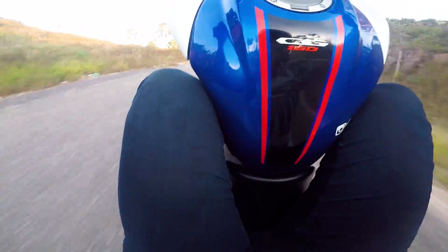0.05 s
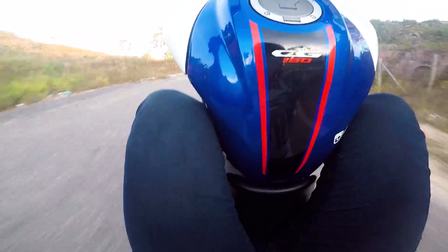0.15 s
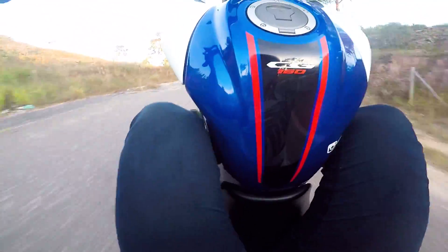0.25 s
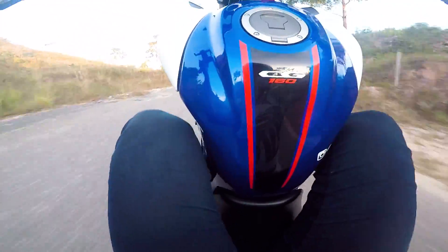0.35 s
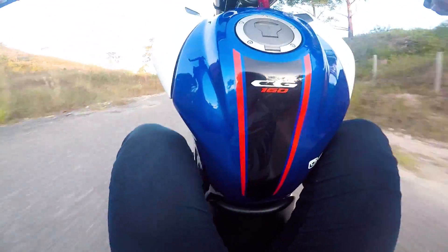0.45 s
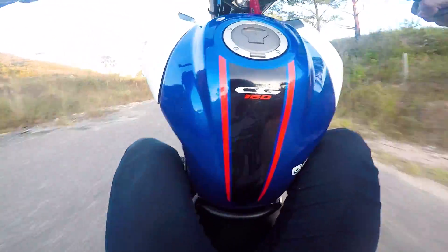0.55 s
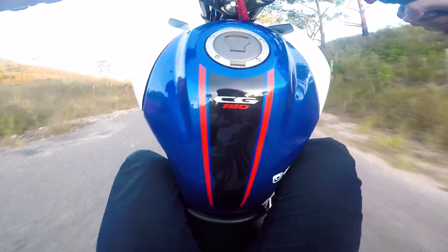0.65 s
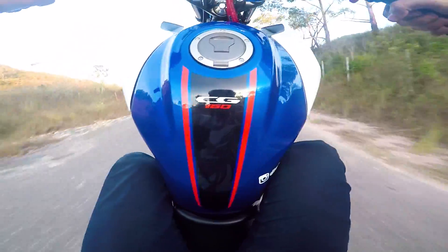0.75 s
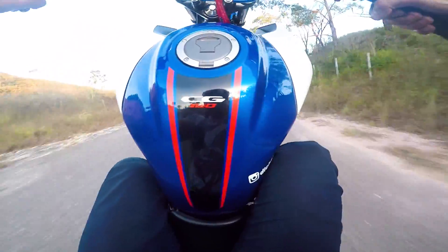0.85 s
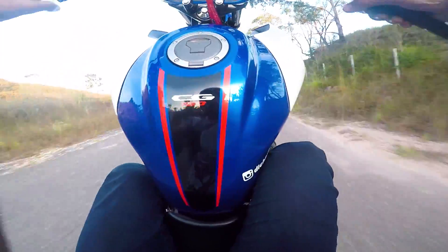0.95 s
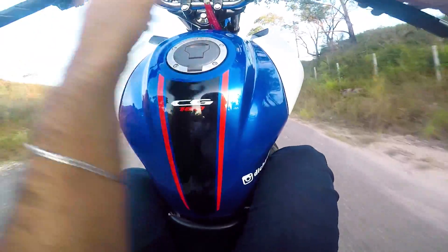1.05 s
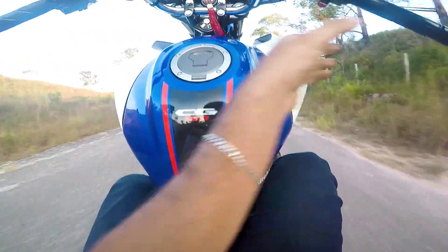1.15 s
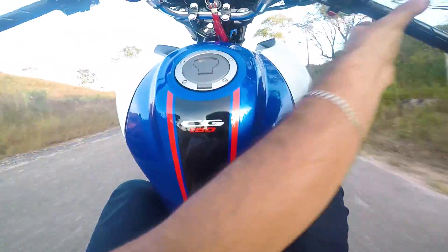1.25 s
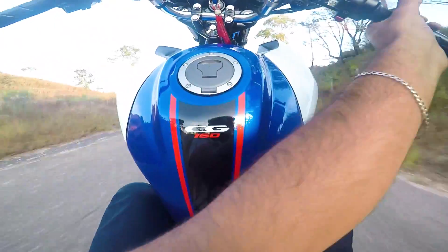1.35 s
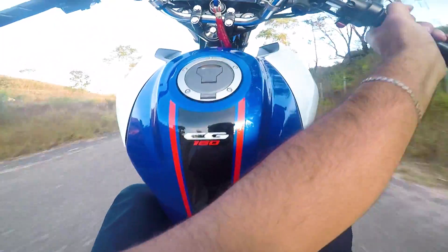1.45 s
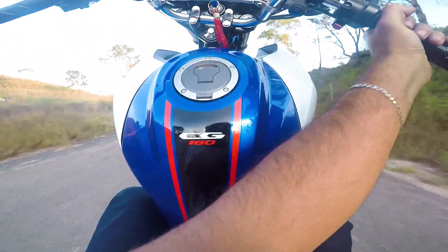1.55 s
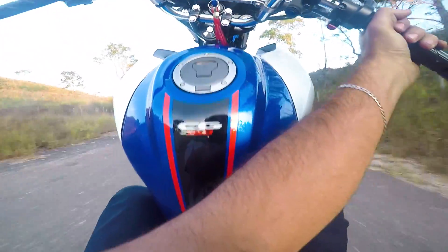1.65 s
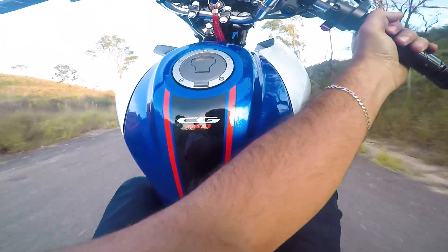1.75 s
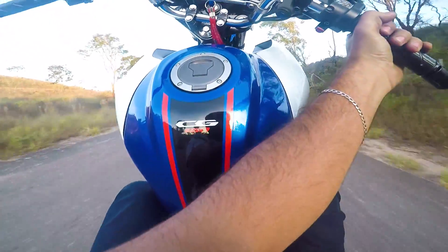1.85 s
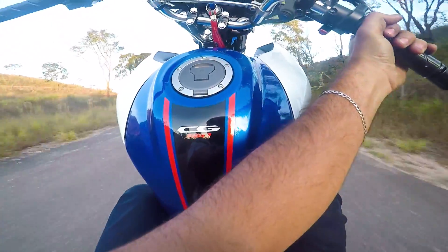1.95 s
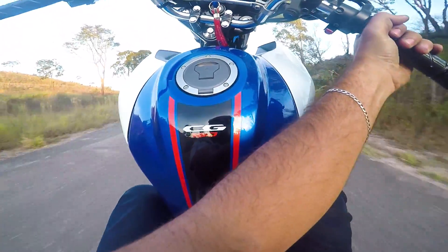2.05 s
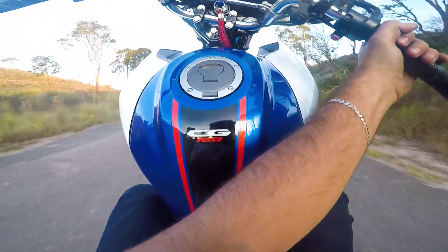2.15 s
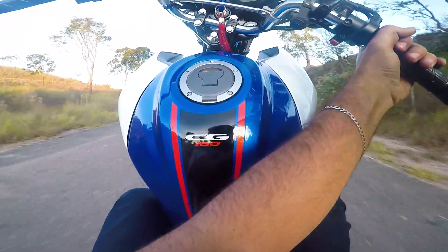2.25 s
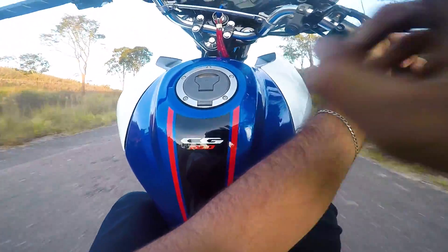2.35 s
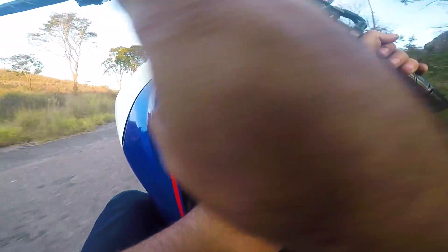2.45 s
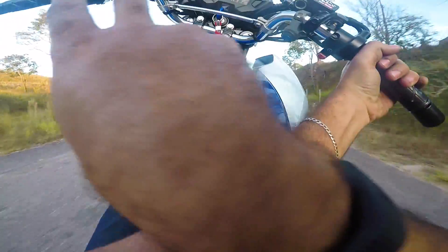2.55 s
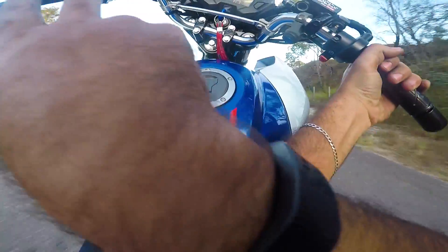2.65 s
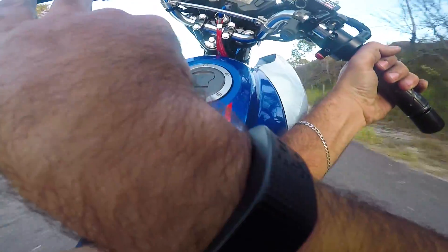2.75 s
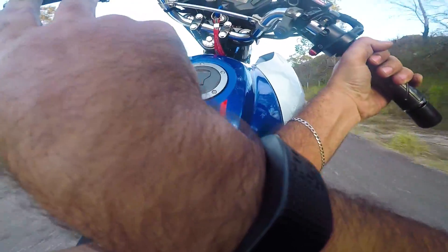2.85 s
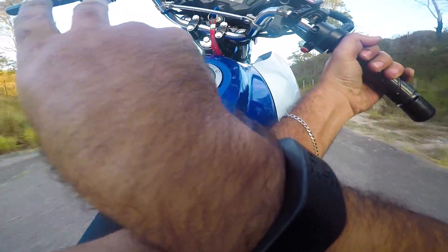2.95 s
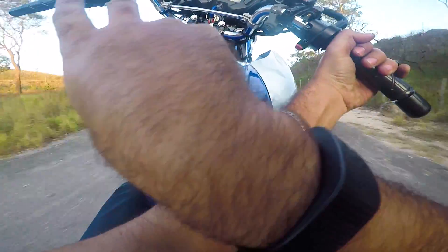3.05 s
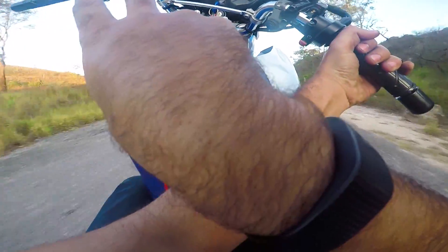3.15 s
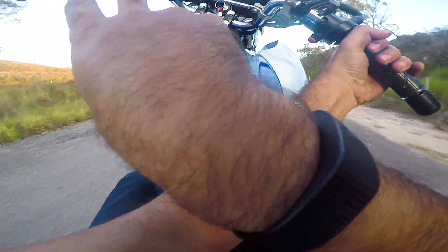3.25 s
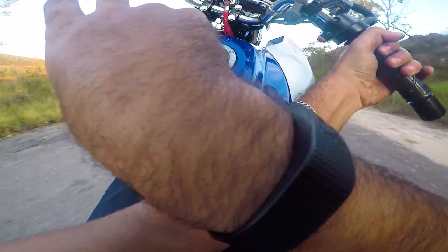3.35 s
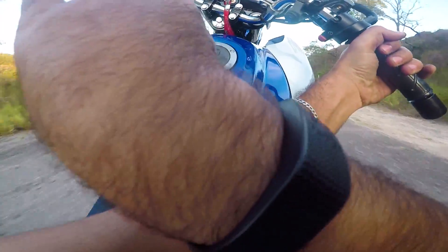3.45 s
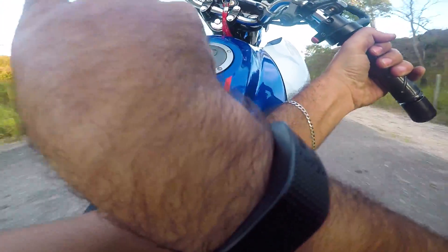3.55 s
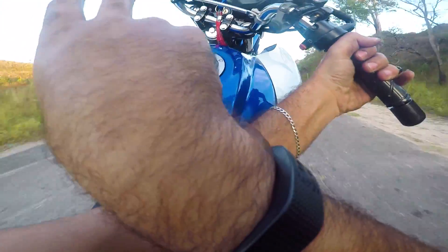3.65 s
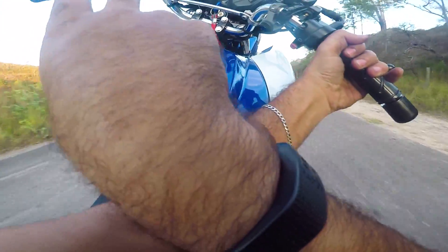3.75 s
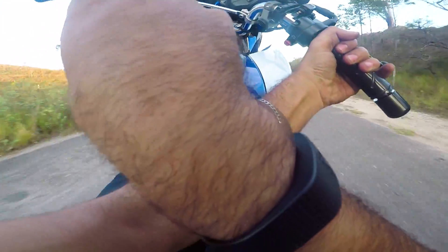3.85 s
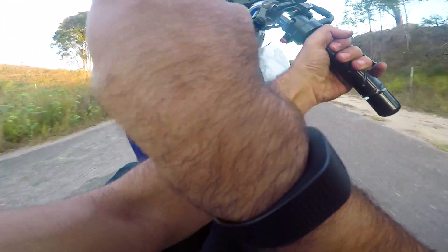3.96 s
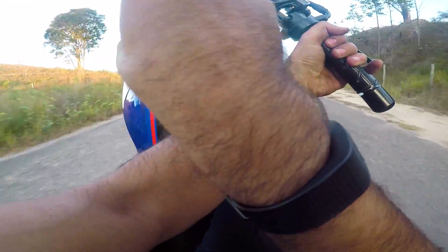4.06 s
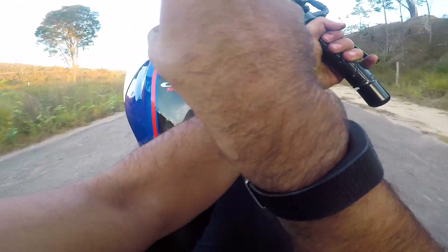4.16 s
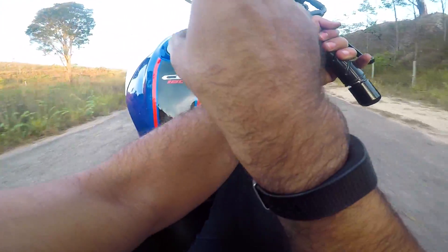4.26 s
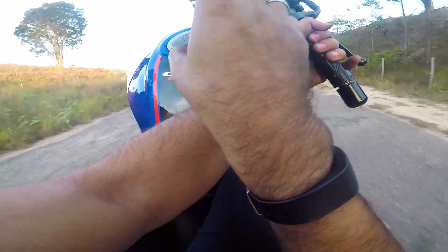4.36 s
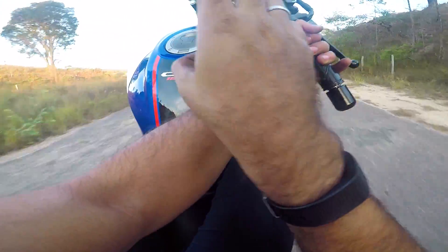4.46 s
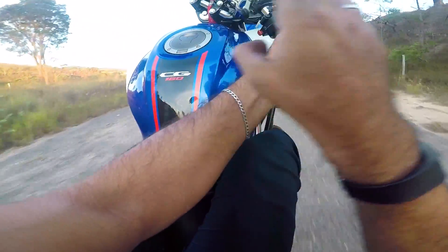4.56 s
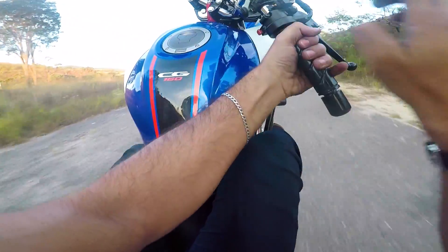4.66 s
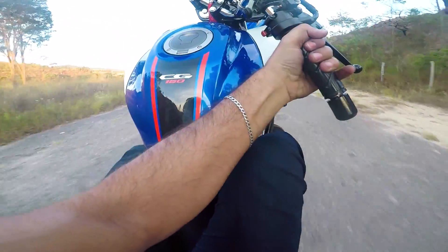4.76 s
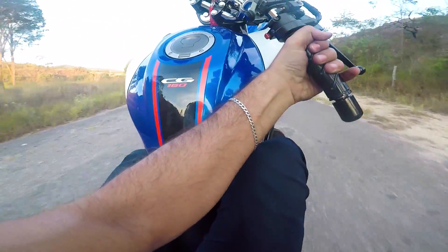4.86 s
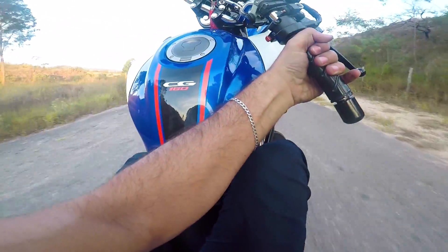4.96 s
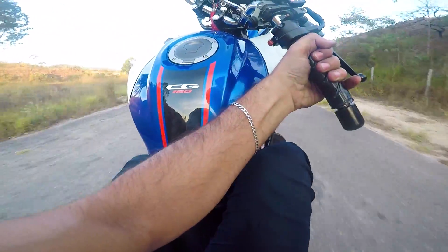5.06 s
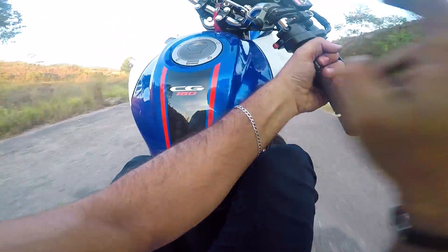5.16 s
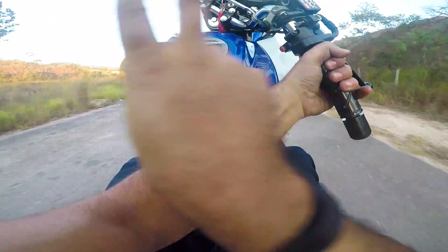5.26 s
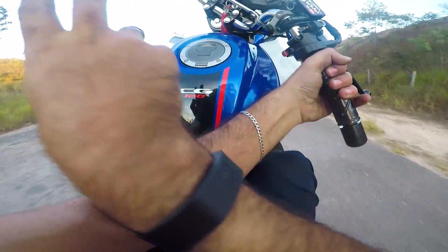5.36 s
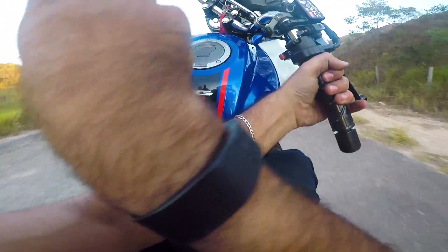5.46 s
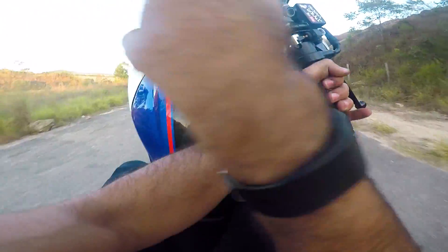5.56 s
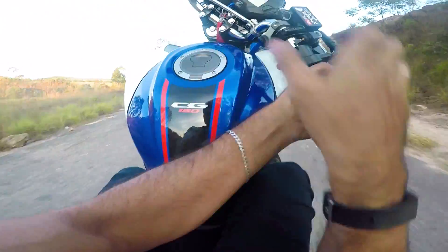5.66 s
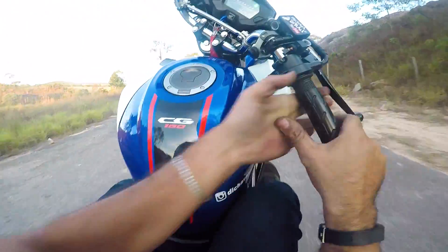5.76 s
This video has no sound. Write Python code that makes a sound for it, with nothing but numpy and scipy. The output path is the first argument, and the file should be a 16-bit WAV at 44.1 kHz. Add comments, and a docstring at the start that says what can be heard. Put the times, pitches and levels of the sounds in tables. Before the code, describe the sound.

A single-cylinder motorcycle coasts along a country road, its exhaust burbling lower and slower under gusty wind and a soft whirr of chain and tyres. The throttle opens and the engine booms up to its rev limiter as the wind fades. It stays there, droning and firing rapid, even bursts of sharp cracks from the open pipe until the throttle shuts. The microphone is close, on the rider's chest.

```python
"""A one-cylinder motorcycle coasts with its throttle shut in buffeting wind. Chain and tyres whirr, unburnt
gas puffs from the pipe, the intake drones, a gear whine falls and a valve ticks. Near 1.5 s the spark
returns and the throttle opens: the engine booms and snarls up to its speed limiter as the wind fades.
From 1.9 s the limiter keeps cutting the spark, letting three firings crack through the open pipe each time
the speed has sagged. At 5.7 s the throttle shuts. Two microphone ports on the rider's chest hear it all."""
import sys
import numpy as np
from scipy import signal
from scipy.fft import rfft, irfft, next_fast_len
from scipy.io import wavfile
from scipy.ndimage import uniform_filter1d

SR = 44100
rng = np.random.default_rng(int(sys.argv[2]) if len(sys.argv) > 2 else 0)


def master_out(mix):
    """Clip the mix to full scale and print it as 16-bit PCM to the path in sys.argv[1]."""
    frames = np.transpose(np.atleast_2d(mix))
    ceiling = np.clip(frames, -1, 1)
    pcm = np.round(ceiling * 32767).astype(np.int16)
    wavfile.write(sys.argv[1], SR, pcm)


N = 256201
TIME = np.arange(N) / SR
LIMIT_LOW, LIMIT_HIGH, CLIMB_S = 77.5, 81.5, .04  # cycles per second at the limiter; time to climb
FIRST_CUT_S, SPARK_ON_S = 1.92, .033

# Engine speed, coasting then revving: time_s, cycles_per_s
SPEED = [(0, 58.1), (0.4, 48.8), (.6, 44.3), (0.83, 39.5), (.99, 36.4), (1.18, 32.2), (1.32, 29.8),
         (1.4, 29.2), (1.44, 30.9), (1.5, 35.7), (1.62, 51.0), (1.85, 76.6), (1.9, 80.5), (1.925, 81.3)]
# Each return of the spark: start_s, crack_db
RESTARTS = [(1.4337, -33), (2.0243, -35), (2.1626, -33), (2.2883, -33), (2.4267, -36), (2.5525, -36),
            (2.6905, -35), (2.8286, -34), (2.9668, -35), (3.1051, -36), (3.2434, -36), (3.3816, -34),
            (3.5198, -34), (3.6581, -34), (3.7964, -33), (3.9344, -32), (4.0726, -31), (4.2108, -32),
            (4.3491, -31), (4.4875, -31), (4.6132, -31), (4.7512, -30), (4.8768, -32), (5.0149, -33),
            (5.1406, -32), (5.2788, -33), (5.4045, -34), (5.5428, -33), (5.6683, -33)]
# Speed around each return at the limiter: offset_s, cycles_per_s
BOUNCE = [(-.007, LIMIT_LOW), (CLIMB_S - .007, LIMIT_HIGH), (.05, 80.65)]
# Tone of the wind: pitch_hz, level_db
WIND_TONE = [(5, -26), (10, -3.5), (22, 8), (40, -7), (80, -15), (170, -23), (400, -28.5), (800, -34),
             (1500, -50), (3000, -96)]
# The wind dies as the bike stops: time_s, level_db
WIND_LEVEL = [(0, -15.5), (1., -14), (1.15, -16), (1.8, -16), (1.95, -23.5), (2.5, -25), (4.5, -27.5),
              (5.81, -29)]
# Gusts: peak_s, boost_db
GUSTS = [(.05, 2), (.17, 2), (.39, 5.5), (.48, 1), (.68, 1), (.75, 0.5), (.92, 2), (1.21, 1), (1.43, 6.5)]
# Tone of the rolling parts: pitch_hz, level_db
WHIRR_TONE = [(530, -35.5), (900, -7), (1050, -4), (1170, -6.5), (1440, -4), (1620, -11), (1910, -9.5),
              (2100, -18.5), (2510, -15), (3040, -21.5), (3580, -21), (3890, -20), (4350, -28), (5410, -34),
              (6290, -33), (8680, -43), (10200, -39.5), (12300, -49), (15000, -61)]
# Their fade: time_s, level_db
WHIRR_LEVEL = [(0, -35.5), (.5, -36), (.9, -39), (1.4, -41.5), (2., -50)]
# Tone of an unburnt puff: pitch_hz, level_db
PUFF_TONE = [(15, -30), (40, 0), (1100, 0), (2200, -30), (4000, -90)]
# Pipe rings after a puff: pitch_hz, width_hz, level_db
PUFF_RINGS = [(144, 44, 5), (223, 154, -10.5), (285, 30, -5), (540, 47, -5.5), (655.5, 34, -6.5)]
# Thump of a puff: time_s, level_db
THUMP_LEVEL = [(0, -19), (.8, -16), (1.4, -14)]
# Tone of a gulp of air: pitch_hz, level_db
GULP_TONE = [(20, -40), (100, -25), (165, -14), (215, 0), (480, 0), (570, -10), (1300, -20), (2200, -45),
             (4000, -90)]
# Rings of the airbox, the intake's chamber: pitch_hz, width_hz, level_db
AIRBOX_RINGS = [(228.8, 43.6, 2.9), (354.1, 45.9, -1.1), (399.6, 51.1, -.8), (450.3, 46.5, -3.2)]
# Each airbox ring in the late tone: change_db
AIRBOX_LATE = [0.28, -2, 0.73, -2.3]
# Drone and snarl shift from an early to a late tone: time_s, late_share
TONE_SHIFT = [(3.3, 0.074), (4.1, 0.62)]
# Piston hums: waves_per_cycle, level_db, delay_cycles
PISTON_HUMS = [(1, -19, 0.29), (2, -11, 0.433)]
# Gear whine: time_s, pitch_hz, level_db
WHINE = [(.14, 1987, -56), (0.199, 1915, -40), (.33, 1830, -36.5), (.37, 1810, -56)]
# Rings of a valve tick: pitch_hz, half_width_hz, level_db
TICK_RINGS = [(2400, 110, 5), (2720, 250, 7.5), (3680, 570, -22)]
# Ticks are clearest at low speed: time_s, level_db
TICK_LEVEL = [(0, -62), (.85, -49), (1., -47.5), (1.2, -43.5), (1.4, -50), (1.45, -80)]
# Intake and pipe rings under load: pitch_hz, width_hz, level_db, delay_cycles
BOOM_RINGS = [(231, 62, 4, .3), (277, 48, 3.5, .3), (384.5, 89, 0, 0.298), (596, 90, -9.5, 0.054)]
# Their swell: time_s, level_db
BOOM_LEVEL = [(1.38, -50), (1.42, -28), (1.49, -15.5), (1.58, -15), (1.7, -21), (1.85, -59)]
# Tone of rushing gas: pitch_hz, level_db
RUSH_TONE = [(200, -34), (400, -4), (700, -5), (950, 0.5), (1700, -5), (2800, -12.5), (3600, -15.5),
             (4000, -13.5), (4300, -22), (4600, -18), (4900, -25), (5400, -24), (6300, -25), (8000, -31),
             (15000, -50)]
# Its rise on revving: time_s, level_db
RUSH_LEVEL = [(1.4, -56), (1.5, -28), (2., -33), (5.81, -32.5)]
# Valve gear at speed: pitch_hz, width_hz, level_db
RASP_RINGS = [(3930, 380, -10), (4530, 320, -10)]
# Firings hit harder while speeding up: time_s, boost_db
CRACK_BOOST = [(1.435, -2.5), (1.47, 5.5), (1.6, 5), (1.75, 3.5), (1.92, 0)]
# Bursts within one firing: start_s, gas_db, spike_db
BURSTS = [(0, -3, -20.5), (.0015, -3.5, -6), (.003, -3, -3)]
# Pipe rings after a firing: pitch_hz, width_hz, level_db
PIPE_RINGS = [(1136, 90, -2.5), (1770, 640, -3), (2497, 130, 1.5), (2520, 950, -5), (4330, 1840, -9.5),
              (4980, 110, -8.5), (7200, 3450, -22)]
# Clean pipe rings sink and swell: time_s, bark_hz, bark_db, blat_hz, blat_db, clang_db
CLEAN_RINGS = [(1.45, 1342, 62.5, 1950, 38, 41), (1.7, 1307, 62.5, 1960, 57, 45),
               (1.818, 1283, 65, 1770, 53, 46.5), (1.9, 1205, 60, 1800, 57, 38),
               (2., 1194, 61.5, 1610, 61, 42), (2.298, 1245, 61, 1600, 55.5, 42),
               (2.43, 1180, 59.5, 1764, 63, 38), (2.849, 1230, 57.5, 1850, 57, 40),
               (3.099, 1210, 64, 1775, 64, 38.5), (3.601, 1210, 54, 1724, 55.5, 36.5),
               (4.099, 1210, 46, 1630, 56.5, 41.5), (4.5, 1145, 42, 1595, 54.5, 43.5),
               (4.649, 1210, 57, 1586, 54, 45), (5.05, 1240, 62, 1540, 38, 37.5),
               (5.2, 1170, 38, 1590, 54.5, 40.5), (5.7, 1213, 44, 1700, 48, 42.5)]
# Clang of the pipe's wall: pitch_hz, width_hz, level_db
WALL_RINGS = [(2460, 120, 12), (2950, 100, 6.5), (4160, 107, 1), (5050, 140, -0.5)]
# Hot jet at the pipe's mouth: pitch_hz, level_db
SIZZLE_TONE = [(3000, -29), (6000, 4), (9000, -5.5), (12000, -8), (15000, -27.5)]
# Engine overtones, from the 7th up: early_db, late_db
OVERTONES = [(-38.5, -30), (-30.5, -33.5), (-49.5, -32), (-36, -28.5), (-40.5, -41), (-37.5, -37),
             (-33.5, -29), (-45, -41), (-53, -32.5), (-45, -46), (-39, -36), (-53, -54.5), (-53, -50),
             (-49.5, -49), (-50, -53)]
# Those from the 14th up swell for a while: time_s, boost_db
NASAL_BOOST = [(4.55, -0.5), (4.65, 5.5), (5.1, 5.5), (5.25, -1)]
# How alike the two ports sound: pitch_hz, likeness_share
PORT_LIKENESS = [(300, 1), (600, .9), (1200, .8), (2500, .8), (4000, .5), (9000, .4)]
# How far the left port leads: pitch_hz, lead_radians
PORT_LEAD = [(100, 0), (860, 0.43), (1210, 1.64), (1720, 2.5), (2450, 2.5), (3270, 3), (4500, 5),
             (7000, 4.5)]
# How much louder the left port is: pitch_hz, level_db
PORT_BALANCE = [(60, 3), (250, 2.5), (400, 4), (480, 6), (640, 3.5), (800, 1), (1050, -0.5), (1270, 2.5),
                (2350, 1.5), (4320, 1.5), (7960, 1.5), (14700, -8)]


def amp(db):
    """Turns decibels into a multiplier."""
    return 10 ** (np.asarray(db) / 20)


def evened(x):
    """Scales a sound to an average power of 1."""
    return x / np.sqrt(np.mean(x ** 2) + 1e-20)


def curve(rows):
    """Joins (time, value) points with straight lines."""
    return np.interp(TIME, *np.transpose(rows))


def shaped(x, points, gain=amp):
    """Weights each pitch in a sound by a table."""
    pitch_hz, value = np.transpose(points)
    size = next_fast_len(N)
    hz = np.fft.rfftfreq(size, 1 / SR)
    weights = gain(np.interp(np.log(hz + 1), np.log(pitch_hz + 1), value))
    return irfft(rfft(x, size) * weights, size)[..., :N]


def ring(x, rings):
    """Rings at fixed pitches, alternating in sign as along a tube."""
    out = 0
    for k, (hz, width, db) in enumerate(rings):
        decay = np.exp(-np.pi * width / SR)
        step = decay * np.exp(2j * np.pi * hz / SR)
        out = out + (-1) ** k * amp(db) * signal.lfilter([1 - decay], [1, -step], x).real
    return out


def soft_ring(x, hz, width):
    """A ring that swells in, then dies; its pitch may be fixed or sliding."""
    spin = np.exp(2j * np.pi * np.cumsum(np.broadcast_to(hz, N)) / SR)
    decay = np.exp(-np.pi * width / SR)
    return (spin * signal.lfilter([(1 - decay) ** 2], [1, -2 * decay, decay ** 2], x / spin)).real


def drift(hz):
    """A slow random wander."""
    return evened(signal.lfilter(*signal.butter(2, hz, fs=SR), rng.standard_normal((2, N))))[0]


def engine_cycles():
    """Counts four-stroke cycles; a whole number fits between returns of the spark."""
    starts = np.transpose(RESTARTS)[0]
    bounces = [(s + offset, hz) for s in starts[1:] for offset, hz in BOUNCE]
    last_sag = (2 * starts[-1] - starts[-2], LIMIT_LOW)
    cycles = np.cumsum(curve(list(SPEED) + bounces + [last_sag])) / SR
    cycles -= np.interp(starts[0], TIME, cycles)
    at_starts = np.interp(starts, TIME, cycles)
    whole = np.cumsum(np.round(np.diff(at_starts, prepend=0)))
    return cycles - np.interp(TIME, starts, at_starts - whole)


def speed(cycles):
    """Engine speed, where 1 is 80 cycles per second."""
    return np.gradient(cycles) * SR / 80


def pulses(cycles, delay, spread_db):
    """One click a cycle, no two quite alike."""
    count = np.floor(cycles - delay)
    return np.diff(count, prepend=count[0]) * amp(spread_db * rng.standard_normal(N))


def throttle(open_s=1.5, opening_s=.098, shut_s=5.735, shutting_s=.02):
    """The twist grip: 0 shut to 1 open."""
    return np.clip((TIME - open_s) / opening_s, 0, 1) * np.clip(1 - (TIME - shut_s) / shutting_s, 0, 1)


def drone_gain(cycles):
    """The drone is loud when the throttle is open and the engine turns fast."""
    below_limit = np.maximum(LIMIT_LOW - np.gradient(cycles) * SR, 0)
    shut, wide_open = amp(-25 - .27 * below_limit), amp(-12.5 - .33 * below_limit)
    return shut + (wide_open - shut) * throttle()


def wind(gust_s=.051):
    """Air buffets the microphone housing; gusts lift the rumble a little more than the hiss."""
    noise = shaped(rng.standard_normal((2, N)), WIND_TONE)
    noise[1] = .99 * noise[0] + .1 * noise[1]  # nearly alike on both sides
    steady = noise / np.sqrt(uniform_filter1d(noise[0] ** 2, 5000) + 1e-20)
    gust_db = sum(db * np.exp(-((TIME - s) / gust_s) ** 2) for s, db in GUSTS)
    rumble = signal.filtfilt(*signal.butter(2, 150, fs=SR), steady)
    gusty = amp(gust_db) * rumble + amp(.93 * gust_db) * (steady - rumble)
    return amp(curve(WIND_LEVEL) + np.array([[.5], [-.5]])) * gusty


def rolling_whirr(cycles):
    """Chain, tyres and valve gear hiss with a slight throb."""
    throb_db = 1.5 * np.cos(2 * np.pi * cycles) + drift(hz=6)
    return amp(curve(WHIRR_LEVEL) + throb_db) * evened(shaped(rng.standard_normal((2, N)), WHIRR_TONE))


def pipe_burble(cycles, thump_hz=125, thump_s=.0045):
    """With the throttle shut, unburnt gas puffs from the pipe: a dull thump, then a short ring."""
    gas = .0025 * rng.standard_normal((2, N)) * (.3 + np.exp(-(cycles % 1) / .3))
    puffs = pulses(cycles, delay=.2, spread_db=1.4)
    t = np.arange(-600, 601) / SR
    push_pull = -np.sin(2 * np.pi * thump_hz * t) * np.exp(-(t / thump_s) ** 2)
    thumps = amp(curve(THUMP_LEVEL)) * signal.oaconvolve(puffs, push_pull, "same")
    rings = amp(-25.5) * evened(ring(shaped(puffs + gas, PUFF_TONE), PUFF_RINGS))
    return (1 - throttle()) * (rings + thumps)


def intake_drone(cycles):
    """Each gulp of air rings the airbox, half a cycle from the firing; rushing air roughens it."""
    rush = .0009 * rng.standard_normal((2, N)) * (1 + np.cos(2 * np.pi * (cycles - .6)))
    gulps = pulses(cycles, delay=.46, spread_db=.35) + rush
    gulps = shaped(gulps, GULP_TONE) / np.sqrt(speed(cycles))
    late = curve(TONE_SHIFT)
    late_rings = [(hz, width, db + change) for (hz, width, db), change in zip(AIRBOX_RINGS, AIRBOX_LATE)]
    drone = (1 - late) * ring(gulps, AIRBOX_RINGS) + late * ring(gulps, late_rings)
    return drone_gain(cycles) * evened(drone)


def piston_hum(cycles):
    """Piston and crank shake the frame, harder at speed."""
    hum = sum(amp(db) * np.cos(2 * np.pi * k * (cycles - delay)) for k, db, delay in PISTON_HUMS)
    return drone_gain(cycles) * np.sqrt(2) * hum * speed(cycles) ** 2


def gear_whine():
    """A thin gear tone falls as the bike slows."""
    times, hz, db = np.transpose(WHINE)
    tone = np.sin(2 * np.pi * np.cumsum(np.interp(TIME, times, hz)) / SR)
    return amp(np.interp(TIME, times, db, -120, -120)) * tone


def valve_ticks(cycles):
    """A valve closes with a light tick each cycle."""
    ticks = pulses(cycles, delay=.095, spread_db=5.6)
    rings = sum(amp(db) * soft_ring(ticks, hz, 2 * half_width) for hz, half_width, db in TICK_RINGS)
    return amp(curve(TICK_LEVEL)) * evened(rings)


def load_boom(cycles):
    """As the throttle opens, intake and pipe boom in turn until the speed is up."""
    rings = sum(amp(db) * soft_ring(pulses(cycles, delay, spread_db=1), hz, width)
                for hz, width, db, delay in BOOM_RINGS)
    return amp(curve(BOOM_LEVEL)) * evened(rings / np.sqrt(speed(cycles)))


def gas_rush(cycles):
    """Rushing gas swells unevenly once a cycle, over the fine rasp of the valve gear."""
    swell_db = (4.2 + 1.2 * drift(hz=30)) * np.cos(2 * np.pi * (cycles - .22)) + 1.2 * drift(hz=8)
    hiss = shaped(rng.standard_normal((2, N)), RUSH_TONE)
    low = signal.lfilter(*signal.butter(2, 1500, fs=SR), hiss)
    ticks = pulses(cycles, delay=.15, spread_db=4.5)
    rasp = sum(amp(db) * evened(soft_ring(ticks, hz, width)) for hz, width, db in RASP_RINGS)
    return amp(curve(RUSH_LEVEL)) * (amp(swell_db) * hiss / np.std(hiss - low) + rasp / 4)


def latest_restart():
    """Seconds since the spark last returned, and that return's level."""
    starts, db = np.transpose(RESTARTS)
    latest = np.maximum(np.searchsorted(starts, TIME + .004) - 1, 0)
    return TIME - starts[latest], db[latest]


def sparking():
    """True while the spark is on: steadily at first, then in short spells."""
    since_s, _ = latest_restart()
    return (TIME > RESTARTS[0][0] - .004) & ((TIME < FIRST_CUT_S) | (since_s < SPARK_ON_S))


def pipe_ringing(firings):
    """Firings knock the pipe into a low bark, a higher blat and a clang of its wall."""
    times, *columns = np.transpose(CLEAN_RINGS)
    bark_hz, bark_db, blat_hz, blat_db, clang_db = [np.interp(TIME, times, c) for c in columns]
    knock = signal.lfilter(*signal.butter(2, [900, 5000], "band", fs=SR), firings)
    late_knock = np.roll(knock, round(BURSTS[-1][0] * SR / 2))
    bark = amp(bark_db) * soft_ring(knock, bark_hz, width=163)
    blat = amp(blat_db) * soft_ring(knock, blat_hz, width=163)
    clang = amp(clang_db) * ring(late_knock, WALL_RINGS)
    return bark + clang + blat * np.array([[1], [-.6]])  # the blat partly cancels at the right port


def exhaust_cracks(cycles):
    """In each firing three quick bursts of hot gas ring the pipe, then suction returns from its end."""
    since_s, restart_db = latest_restart()
    boost_db = curve(CRACK_BOOST)
    first_db = 2.5 * (since_s < SPARK_ON_S / 4)  # the first firing after a cut has more fuel
    clicks = np.roll(pulses(cycles, delay=0, spread_db=1), -33) * sparking()  # 33 samples early
    firings = clicks * amp(boost_db + restart_db + first_db)
    t = np.arange(1500) / SR
    bursts = sum(amp(db) * np.exp(-abs(t - s) / .0014) * (t >= s) for s, db, _ in BURSTS)
    gas = signal.oaconvolve(firings, bursts + .15 * np.exp(-t / .008))[:N]
    blow = signal.oaconvolve(firings, np.diff(bursts, prepend=0))[:N]
    drive = gas * rng.standard_normal((2, N)) + .86 * uniform_filter1d(blow, size=5)
    crack = amp(28.5) * ring(drive, PIPE_RINGS) + pipe_ringing(firings)
    jet = signal.oaconvolve(firings, np.exp(-t / .0092))[:N]
    sizzle = amp(-6.5) * shaped(jet * rng.standard_normal((2, N)), SIZZLE_TONE)
    spikes = sum(amp(db) * np.exp(-((t - s - .0003) / .0003) ** 2) for s, _, db in BURSTS)
    push = signal.oaconvolve(firings, amp(21.5) * spikes)[:N]
    suction = -amp(-9.5) * np.exp(-((t - .0062) / .0011) ** 2)
    pull = signal.oaconvolve(clicks * amp(boost_db / 2), suction)[:N]
    bass_cut = [(20, -30), (45, -12), (70, 0), (20000, 0)]  # pitch_hz, level_db
    return shaped(crack + sizzle + push + pull, bass_cut)


def engine_snarl(cycles, waver_db=3):
    """With the throttle open, slowly wavering overtones grow with the engine's speed."""
    out, late, nasal_db = 0, curve(TONE_SHIFT), curve(NASAL_BOOST)
    for k, (early_db, late_db) in enumerate(OVERTONES, 7):
        waver = np.sin(2 * np.pi * (rng.uniform(.46, 2.557) * TIME + rng.random((2, 1))))
        scatter = .77 * (rng.random() - .5)  # so the overtones only roughly line up
        tone = np.cos(2 * np.pi * (k * (cycles - .1937) + scatter))
        level_db = early_db + (late_db - early_db) * late + waver_db * waver + (k >= 14) * nasal_db
        out = out + amp(level_db) * tone
    dip = 1 - .47 * uniform_filter1d(1. * sparking(), size=300)  # quieter while the spark is on
    return throttle() * dip * out * speed(cycles) ** 3


def microphone_ports(pair):
    """Blends two versions of a sound into what the left and right ports hear."""
    main, other = pair
    left = shaped(main, PORT_LEAD, lambda lead: np.exp(1j * lead))
    right = shaped(main, PORT_LIKENESS, lambda share: share)
    right += shaped(other, PORT_LIKENESS, lambda share: np.sqrt(1 - share ** 2))
    return np.array([shaped(left, PORT_BALANCE, lambda db: amp(db / 2)),
                     shaped(right, PORT_BALANCE, lambda db: amp(-db / 2))])


def scene():
    """The bike as the two ports hear it, plus the wind."""
    cycles = engine_cycles()
    engine = intake_drone(cycles) + load_boom(cycles) + engine_snarl(cycles) + piston_hum(cycles)
    engine += exhaust_cracks(cycles) + pipe_burble(cycles) + gas_rush(cycles) + valve_ticks(cycles)
    return microphone_ports(engine + rolling_whirr(cycles) + gear_whine()) + wind()


def record(dry):
    """Rounds off the peaks softly, then cuts the highest treble."""
    soft = np.tanh(dry / 1.4) * 1.4
    treble_cut = signal.firwin(1023, 15050, window=("kaiser", 9), fs=SR)
    return signal.oaconvolve(soft, treble_cut[None], "same")


dry = scene()
out = record(dry)
master_out(out)
```